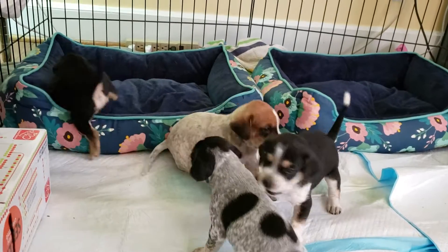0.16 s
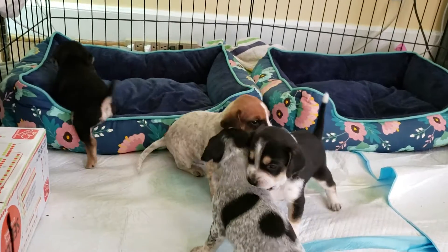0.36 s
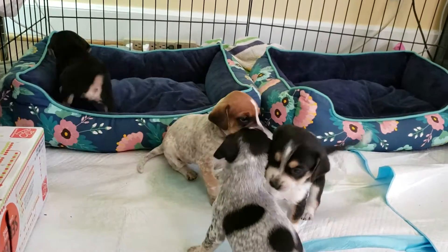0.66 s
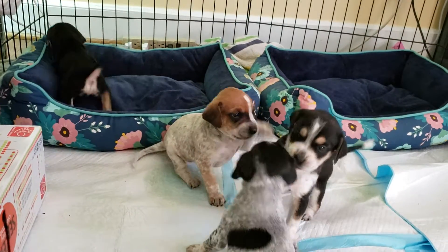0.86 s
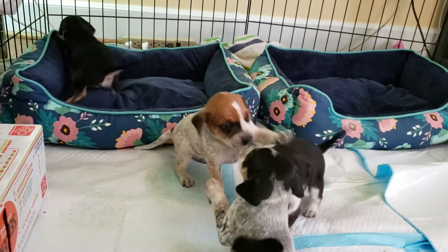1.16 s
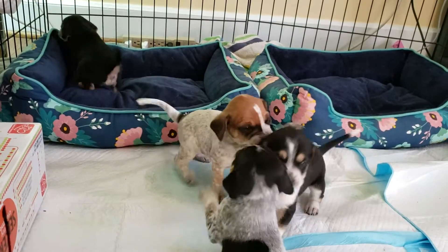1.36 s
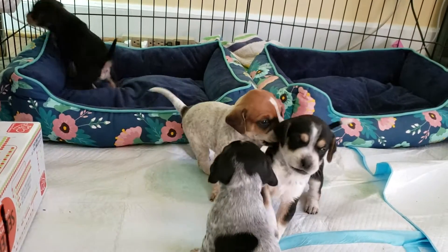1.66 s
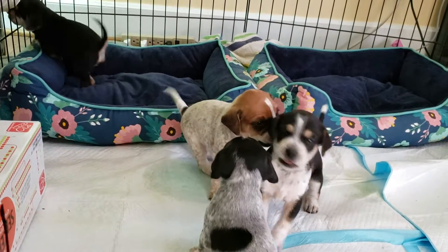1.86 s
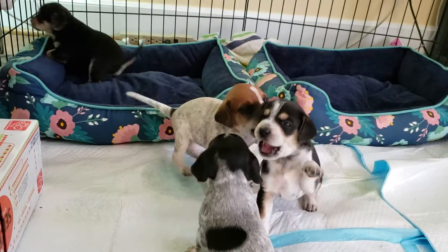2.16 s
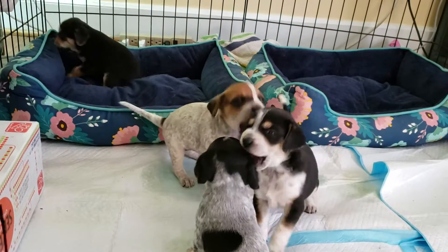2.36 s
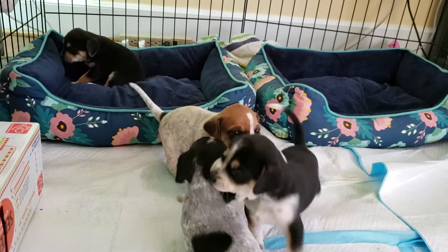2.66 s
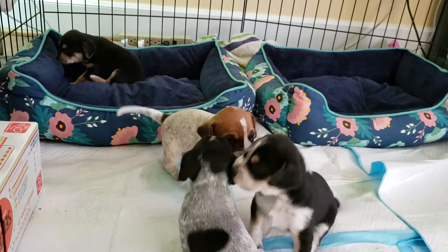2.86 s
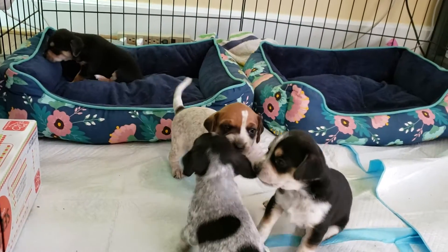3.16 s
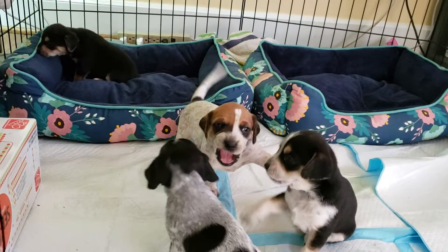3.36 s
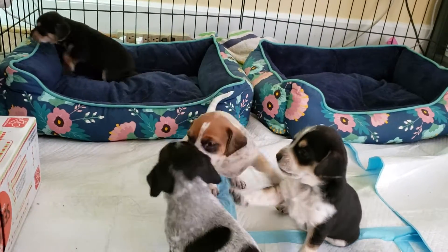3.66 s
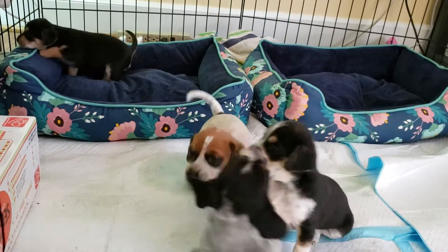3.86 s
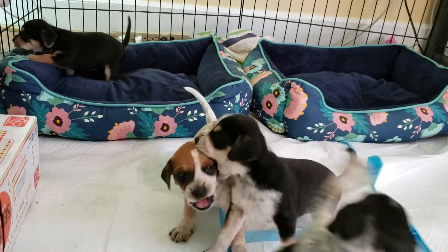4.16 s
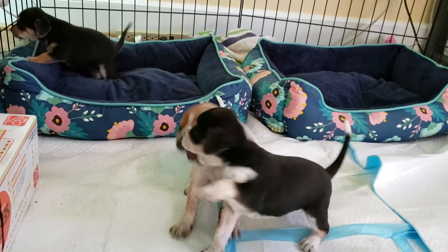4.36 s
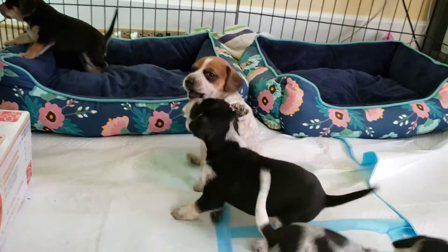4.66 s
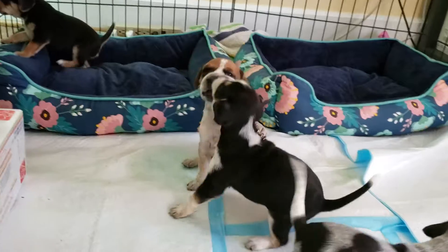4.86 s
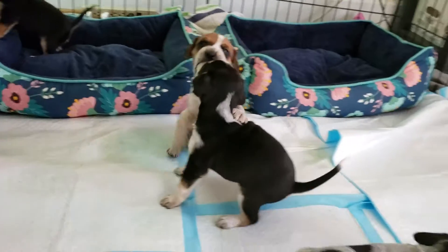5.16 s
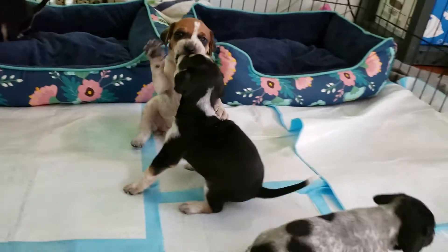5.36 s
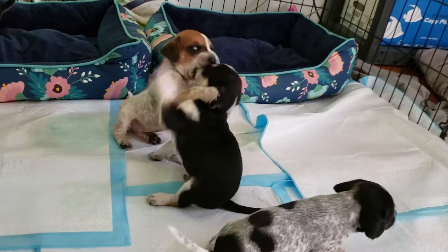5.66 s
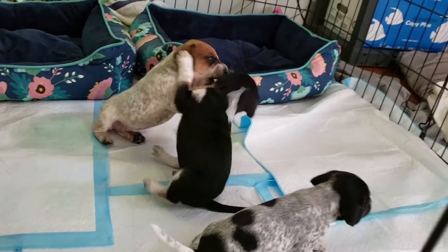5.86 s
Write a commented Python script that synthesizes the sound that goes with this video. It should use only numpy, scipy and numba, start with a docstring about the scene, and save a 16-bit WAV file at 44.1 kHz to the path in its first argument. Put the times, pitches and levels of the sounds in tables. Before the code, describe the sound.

Quiet opening of rustling absorbent pads and padding paws, with a slight hiss behind. Around two seconds a puppy squeaks several times, then gives a soft low whimper. The play turns rougher: fluttering, throaty little growls in quick spurts, one sharp hoarse bark, clicks of claws or teeth and dull footfalls. Close stereo pickup, short reflections of a small indoor room; growling continues to the end.

```python
"""Soft hiss and low rumble, paper pads rustling and paws padding: puppies wrestle in an indoor pen.
Four short yips and a low whimper lead into rattling play growls and one hoarse bark.
Voices are pulsing folds or stacked harmonics, shaped by throat and mouth resonances.
Paws are damped sines and noise pats, pads and scuffs are shaped crinkles, claws are tiny noise rings.
A small room answers the voices, footfalls and ticks."""
import sys
import numpy as np
from scipy import signal
from scipy.fft import rfft, irfft
from scipy.io import wavfile
from scipy.ndimage import uniform_filter1d, map_coordinates
from numba import njit

SR = 44100
rng = np.random.default_rng(int(sys.argv[2]) if len(sys.argv) > 2 else 0)


def master_out(mix):
    """Clip the mix to full scale and print it as 16-bit PCM to the path in sys.argv[1]."""
    frames = np.transpose(np.atleast_2d(mix))
    ceiling = np.clip(frames, -1, 1)
    pcm = np.round(ceiling * 32767).astype(np.int16)
    wavfile.write(sys.argv[1], SR, pcm)


N = 264600
TIME = np.arange(N) / SR


def undb(db):
    """Decibels to gain."""
    return 10 ** (np.asarray(db) / 20)


def unit(x):
    """Scale to rms 1."""
    return x / np.sqrt(np.mean(x ** 2) + 1e-20)


def colour(x, points):
    """EQ by (f/Hz, level/dB) points joined on a log-frequency axis."""
    hz, db = np.transpose(points)
    f = np.arange(N + 1) * SR / (2 * N)
    gain = undb(np.interp(np.log(f + 1), np.log(hz), db))
    return irfft(rfft(x, 2 * N) * gain)[..., :N]


def walk(rate):
    """Smooth random drift around 0, with `rate` new values per second."""
    knots = rng.standard_normal(N // 20)
    return map_coordinates(knots, [TIME * rate], order=2, mode="wrap")


def add(out, s, sound):
    """Mix a short sound in at time s."""
    i = max(int(s * SR), 0)
    out[..., i:i + sound.shape[-1]] += sound[..., :N - i]


def bandlimit(x, order, hz, kind):
    """Butterworth filter."""
    return signal.sosfilt(signal.butter(order, hz, kind, fs=SR, output="sos"), x)


# stereo width of diffuse sound: f/Hz, level/dB (side minus mid)
DIFFUSE_WIDTH = [(300, -12.5), (700, -2), (4000, 0)]


def spread(pair):
    """Two unrelated signals as a diffuse field: alike in the bass, unlike in the treble."""
    side = colour(pair[1], DIFFUSE_WIDTH)
    return np.array([pair[0] + side, pair[0] - side])


def lean(pair, balance):
    """Tilt two channels against each other by (f/Hz, left minus right level/dB) points."""
    left = colour(pair[0], [(hz, db / 2) for hz, db in balance])
    right = colour(pair[1], [(hz, -db / 2) for hz, db in balance])
    return np.array([left, right])


# relative spectrum of rumble and hiss: f/Hz, level/dB
FLOOR_SPECTRUM = [(25, -51), (58, 18), (130, -7.5), (400, -25), (1400, -32.5), (2200, -15.5), (6000, -20),
                  (8500, -39), (13000, -77)]
# stereo lean of rumble and hiss: f/Hz, level/dB (left minus right)
FLOOR_BALANCE = [(400, 3.5), (1300, 16), (4400, 14.5), (8000, -7)]
FLOOR_DB = -62.5


def floor():
    """A low room rumble and soft hiss: steady diffuse noise, coloured and tilted in stereo."""
    noise = unit(colour(rng.standard_normal((2, N)), FLOOR_SPECTRUM))
    return lean(spread(noise), FLOOR_BALANCE) * undb(FLOOR_DB)


def crinkle(rate, scatter_db, hiss):
    """Two channels of paper fibres snapping at random (rate per s) over a smooth rubbing hiss."""
    sizes = undb(scatter_db * np.minimum(rng.exponential(size=N), 5))
    snaps = (rng.random(N) < rate / SR) * sizes
    bursts = signal.lfilter([1], [1, -np.exp(-1 / 20)], snaps)  # each dies away over 20 samples
    crackle = unit(bursts * rng.standard_normal((2, N)))
    return (crackle + hiss * rng.standard_normal((2, N))) / np.hypot(1, hiss)


# relative spectrum of the paper pads: f/Hz, level/dB
PAD_SPECTRUM = [(150, 0.5), (400, -12), (2300, -16.5), (6500, -10.5), (8300, -28), (12500, -17.5)]
# weight shifts on the pads: peak t/s, t/s from the peak to where power is e^-2, peak level/dB before flicker
WEIGHT_SHIFTS = [(0.282, 0.13, -55.5), (0.9, 0.13, -59.5), (1.233, 0.089, -59), (1.923, 0.027, -43.5),
                 (2.798, 0.15, -53), (3.83, 0.35, -58.5), (4.399, 0.17, -50), (4.761, 0.1, -51),
                 (5.067, 0.017, -45.5), (5.148, 0.078, -49.5)]
PAD_REST_DB = -69  # rustle between the shifts


def pads():
    """The pads rustle as the puppies shift their weight: each shift swells to a peak and settles."""
    power = undb(PAD_REST_DB) ** 2
    for s, length, db in WEIGHT_SHIFTS:
        swell = np.exp(-2 * np.abs((TIME - s) / length) ** 0.78)
        power = power + undb(db) ** 2 * swell
    paper = unit(colour(crinkle(rate=1300, scatter_db=4.5, hiss=1.7), PAD_SPECTRUM))
    flicker = undb(1.7 * walk(35))
    return spread(paper * np.sqrt(power) * flicker)


# footfalls: t/s, thud level/dB (peak of each floor tone), pat level/dB (noise rms before its decay)
FOOTFALLS = [(0.027, -60, -51.5), (0.127, -57.5, -52.5), (1.285, -50.5, -56.5), (1.337, -54, -67),
             (2.769, -68, -45.5), (3.795, -57, -55), (5.119, -48, -40.5), (5.152, -48, -43.5),
             (5.236, -53, -51.5)]


def steps(floor_hz=(60, 82, 108), decay_s=0.03, pat_hz=600, pat_s=0.009):
    """Soft paws thud on the floor as three damped tones and pat the pad as a short noise."""
    out, t = np.zeros(N), TIME[:SR // 4]
    for s, thud_db, pat_db in FOOTFALLS:
        thud = np.zeros(len(t))
        for hz in floor_hz:
            detune = 1 + 0.1 * rng.standard_normal()
            thud += np.sin(2 * np.pi * hz * detune * t)
        pat = unit(bandlimit(rng.standard_normal(len(t)), 1, (pat_hz / 4, pat_hz), "band"))
        add(out, s, thud * np.exp(-t / decay_s) * undb(thud_db))
        add(out, s, pat * np.exp(-t / pat_s) * undb(pat_db))
    return bandlimit(out, 4, 48, "high")


# sliding paws: t/s, nominal length t/s (stretched in scuffs), level/dB, centre f/Hz, width [octaves]
PAW_SLIDES = [(0.268, 0.44, -70.5, 890, 0.36), (0.338, 0.064, -65, 1390, 0.51),
              (0.792, 0.21, -73.5, 480, 0.58), (1.8, 0.09, -69.5, 7020, 0.067),
              (1.849, 0.29, -56, 4100, 3.7), (1.891, 0.32, -60.5, 268, 1.08), (2.757, 0.19, -61, 753, 1.08),
              (3.863, 0.11, -56, 4930, 0.33)]


def scuffs(attack=0.26, stretch=1.124):
    """A sliding paw gives a swell of crinkles that rises fast and dies away."""
    out, grain = np.zeros((2, N)), crinkle(rate=770, scatter_db=-3.5, hiss=1.0)
    for s, length, db, hz, octaves in PAW_SLIDES:
        i, n = int(s * SR), int(length * stretch * SR)
        u = np.arange(n) / n  # progress through the slide
        f = np.arange(n // 2 + 1) * SR / n + 1
        band = np.exp(-.5 * (np.log2(f / hz) / octaves) ** 2)
        band = band * np.where(f > 7300, .35, 1)  # duller top
        slide = unit(irfft(rfft(grain[:, i:i + n]) * band, n))
        swell = unit(u ** attack * (1 - u) ** 2)
        add(out, s, slide * swell * undb(db))
    return spread(out)


# claws and teeth ticking: t/s, level/dB (ring rms before its decay), ring f/Hz
CLAW_TICKS = [(0.33, -48, 5730), (0.345, -45, 5050), (1.566, -52, 1010), (1.817, -44.5, 2400),
              (2.091, -34.5, 2700), (3.201, -47, 4600), (3.811, -42.5, 899), (3.861, -40.5, 5810),
              (4.18, -37.5, 2300), (4.616, -39, 889), (5.058, -43, 5638), (5.119, -35, 779)]


def ticks(ring_s=0.0013, sharpness=3):
    """A claw or tooth gives a crack with a very short ring: resonant noise that decays at once."""
    out, t = np.zeros(N), TIME[:SR // 20]
    for s, db, hz in CLAW_TICKS:
        b, a = signal.iirpeak(hz, sharpness, fs=SR)
        ring = unit(signal.lfilter(b, a, rng.standard_normal(len(t))))
        add(out, s, ring * np.exp(-t / ring_s) * undb(db))
    return out


def folds(hz, rough, jitter, skip, shimmer_db, air):
    """Vocal fold pulses; roughness jitters them, weakens every other one and adds puffs of turbulence."""
    phase = np.cumsum(hz * np.exp(jitter * rough * walk(260))) / SR  # in cycles
    cycles = np.arange(1, int(phase[-1]))
    at = np.interp(cycles, phase, np.arange(N))  # pulse positions in samples
    r = rough[at.astype(int)]
    shimmer = undb(shimmer_db * r * rng.standard_normal(len(at)))
    size = shimmer * (1 - np.clip(skip * r, 0, 1) * (cycles % 2))
    # windowed sincs place the pulses between samples
    taps = at.astype(int)[:, None] + np.arange(-7, 9)
    offset = taps - at[:, None]
    shape = np.sinc(offset) * np.cos(np.pi * offset / 16) ** 2
    pulses = np.bincount(np.clip(taps, 0, N - 1).ravel(), (size[:, None] * shape).ravel(), N)
    puff_size = size[np.clip(phase.astype(int) - 1, 0, len(size) - 1)]
    puffs = np.exp(-(phase % 1) / 0.88) * puff_size * rng.standard_normal(N)
    radiated = bandlimit(pulses, 2, 120, "high")  # steady flow makes no sound
    rasp = bandlimit(puffs, 2, 650, "high")  # turbulence has little bass
    return unit(radiated) + air * rough * unit(rasp)


def calls(table, fade_s):
    """For each moment: the gate, time into the nearest call, its arch of effort (0-1), rest of its row."""
    rows = np.array(table)
    ends = rows[:, 0] + rows[:, 1]
    halfway = (ends[:-1] + rows[1:, 0]) / 2
    s, length, *columns = rows[np.searchsorted(halfway, TIME)].T
    gate = sum(np.clip(np.minimum(TIME - on, off - TIME) / fade_s + .5, 0, 1)
               for on, off in zip(rows[:, 0], ends))
    age = np.clip(TIME - s, 0, length)
    return [gate, age, np.sin(np.pi * age / length), length] + columns


# yips: t/s, length t/s, base f/Hz, top f/Hz, top t/s after onset, arch width t/s,
# onset overshoot [share of base], tone level/dB at mid-call, fading [dB per s]
YIP_CALLS = [(1.876, 0.047, 658, 732, 0.051, 0.014, 0.28, -49.5, 68),
             (2.065, 0.13, 714, 1084, .067, .036, 0.04, -41, 0),
             (2.357, 0.14, 548.4, 670, .086, .036, 0.0189, -48.5, 67),
             (2.638, 0.11, 604, 670, 0.076, 0.018, 0.096, -45.5, -17)]
# relative throat colour: f/Hz, level/dB
YIP_THROAT_EQ = [(620, -0.5), (790, -0.5), (1080, 3), (1300, -1.5), (1850, 4.5), (2300, -12)]
# shrill upper resonance before its loudness gain: f/Hz, level/dB
YIP_EDGE_EQ = [(3800, -52), (5000, -14), (6000, -10.5), (8000, -37)]
# the folds close softly: level/dB of harmonics 1 to 4
YIP_HARMONICS = [1, -0.5, -9, -15]
OVERSHOOT_S, YIP_SWELL_DB = .014, 4.5  # the pitch drops into the note; the level sags at both ends
EDGE_FROM_DB, EDGE_GROWTH = -42.5, 0.74  # edge: this many extra dB per dB above the level, less below


def yips():
    """Clear arched squeals through a small throat, shriller when loud."""
    (gate, age, effort, length, base_hz, top_hz,
     top_s, arch_s, overshoot, db, fading) = calls(YIP_CALLS, fade_s=0.013)
    onset = base_hz * (1 + overshoot * np.exp(-age / OVERSHOOT_S))
    arch = np.exp(-.5 * np.abs((age - top_s) / arch_s) ** 2.4)
    hz = onset + (top_hz - base_hz) * arch
    db = db - YIP_SWELL_DB * (1 - effort) - fading * (age - length / 2)
    phase = 2 * np.pi * np.cumsum(hz * (1 + .011 * walk(260))) / SR
    tone = unit(sum(undb(partial) * np.sin(k * phase) for k, partial in enumerate(YIP_HARMONICS, 1)))
    buzz = folds(hz, np.ones(N), jitter=0.004, skip=0, shimmer_db=1.0, air=0.02)
    edge = 2 * colour(buzz, YIP_EDGE_EQ) * undb(EDGE_GROWTH * (db - EDGE_FROM_DB))
    return (unit(colour(tone, YIP_THROAT_EQ)) + edge) * gate * undb(db)


def steady(x):
    """Hold the short-term power of a source near 1, without lifting near-silence all the way."""
    power = uniform_filter1d(x ** 2, size=1300)
    return x / np.sqrt(np.abs(power) + np.mean(x ** 2) / 10 ** 2)


def tract(x, points, size=4096):
    """A throat shaped by (f/Hz, level/dB) points that rings on after each pulse (minimum phase)."""
    hz, db = np.transpose(points)
    f = np.arange(size + 1) * SR / (2 * size)
    gain = undb(np.interp(np.log(f + 1), np.log(hz), db))
    cepstrum = irfft(np.log(gain))[:size]
    cepstrum[1:] *= 2  # folding the cepstrum makes the phase minimal
    response = irfft(np.exp(rfft(cepstrum, 2 * size)))[:size]
    return signal.oaconvolve(x, response)[:N]


@njit
def resonance(x, hz, width_hz):
    """A band-pass whose centre moves, gain 1 at the centre."""
    y, b, low = np.empty(len(x)), 0., 0.
    for i in range(len(x)):
        g, k = np.tan(np.pi * hz[i] / SR), width_hz / hz[i]
        v = (b + g * (x[i] - low)) / (1 + g * (g + k))
        b, low, y[i] = 2 * v - b, low + 2 * g * v, k * v
    return y


def formant(x, hz, width_hz):
    """A moving resonance with steep skirts: two band-passes in a row."""
    return resonance(resonance(x, hz, width_hz), hz, width_hz)


def courses(table, fade_s):
    """For each moment: the gate, roughness, pitch, chest level and mouth level of the growl under way."""
    gate = sum(np.clip(np.minimum(TIME - rows[0][0], rows[-1][0] - TIME) / fade_s + .5, 0, 1)
               for _, rows in table)
    points = [(row[0], rough, *row[1:]) for rough, rows in table for row in rows]
    s, *columns = np.array(points).T
    return [gate] + [np.interp(TIME, s, column) for column in columns]


# whimper, then growls: roughness [0-1], course of rows: t/s, f/Hz before wander,
# chest level/dB and open mouth level/dB before flutter and rattle
GROWL_COURSES = [(.08, [(2.912, 308.7, -47.5, -57.5), (2.948, 303, -37.5, -52),
                 (2.975, 270, -43.5, -57.5)]), (0.4205, [(3.478, 212, -52, -79), (3.53, 264, -44, -57.5),
                 (3.58, 257.3, -49.5, -54.5), (3.615, 232.8, -42, -62.5), (3.68, 261, -48.5, -56),
                 (3.75, 286, -58.5, -79)]), (.55, [(3.975, 237.9, -42, -44.5), (4.04, 331.6, -40, -47),
                 (4.16, 254.4, -47.5, -58.5), (4.218, 300.3, -39, -48)]),
                 (0.75, [(4.247, 301.2, -38.5, -51.5), (4.365, 298.3, -45, -51.5),
                 (4.402, 361.5, -37.5, -47.5), (4.455, 344.5, -34.5, -44.5), (4.535, 290.3, -40, -54.5)]),
                 (.75, [(4.68, 260.2, -49.5, -57), (4.72, 291.5, -43.5, -55.5), (4.743, 336.2, -36, -44.5),
                 (4.786, 312.8, -38.5, -48.5), (4.845, 301, -59, -60.5)]),
                 (0.97, [(5.015, 262.4, -48, -53.5), (5.05, 322.2, -46.5, -51.5), (5.105, 279.9, -52, -60),
                 (5.175, 297.4, -40, -62)]), (.74, [(5.455, 289.5, -52.5, -58), (5.497, 324, -47.5, -55),
                 (5.62, 304.5, -50, -60), (5.735, 335, -55, -56), (5.795, 338.7, -45, -50.5),
                 (5.87, 241, -52, -63.5), (5.96, 311.5, -43, -54), (6.0, 268.8, -39.5, -54)])]
# relative chest colour: f/Hz, level/dB
CHEST_EQ = [(155, -11.5), (210, 7.5), (460, 1.5), (620, -13.5), (1400, -42)]
# relative mouth colour: f/Hz, level/dB
MOUTH_EQ = [(350, -24.5), (650, 3), (2100, 2), (2800, -15), (6700, -15.5), (8500, -47)]
# upper mouth resonance, high when the lips draw back: t/s, f/Hz
LIP_COURSE = [(2.95, 1190), (3.57, 1730), (3.66, 1120), (4.25, 870), (4.46, 1399), (4.81, 2051),
              (5.05, 959.6), (5.51, 1558), (5.68, 1168), (5.81, 1822), (5.92, 849.7)]
JAW_HZ, JAW_WANDER = 786, 0.076  # the lower mouth resonance shifts as the puppy chews
PITCH_WANDER = .06  # share by which the pitch of a fully rough growl wavers
GROWL_SHIMMER_DB = 4.0  # pulse-to-pulse level scatter at full roughness


def growls():
    """Rattling folds boom in the chest and rasp through the mouth, which brightens as the lips draw back."""
    gate, rough, hz, chest_db, mouth_db = courses(GROWL_COURSES, fade_s=0.03)
    rough = np.clip(rough, 0, 1)
    hz = hz * (1 + PITCH_WANDER * rough * walk(35))
    chest_folds = folds(hz, rough, jitter=.15, skip=1.1, shimmer_db=GROWL_SHIMMER_DB, air=0.5)
    body = tract(chest_folds, CHEST_EQ)
    boom = resonance(body, hz, 200.0)  # the throat booms with the fundamental
    chest = steady(body + 1.07 * boom) * undb(chest_db)
    mouth_folds = folds(hz, rough, jitter=.15, skip=1.3, shimmer_db=GROWL_SHIMMER_DB, air=1.1)
    throat = tract(mouth_folds, MOUTH_EQ)
    lips_hz = np.interp(TIME, *np.transpose(LIP_COURSE))
    opening = lips_hz / lips_hz.max()
    jaw = formant(throat, JAW_HZ * np.exp(JAW_WANDER * walk(20)), 474.0)
    lips = formant(throat, lips_hz, 640.0)
    bright = opening * (0.72 * lips + 0.5 * opening * throat)
    mouth = steady(jaw + bright) * undb(mouth_db)
    rattle = undb(1.8 * rough * walk(110))
    flap = np.sin(2 * np.pi * 27.0 * TIME + walk(10))  # loose throat tissue flaps
    flutter = undb(3.1 * rough * flap)
    return gate * (flutter * chest + rattle * mouth)


# relative throat resonances of the bark: f/Hz, level/dB
BARK_THROAT_EQ = [(550, 3.5), (856, 13), (1350, -1), (1560, 8), (2150, 7), (2900, -5), (5300, 0.5),
                  (6700, -8), (8000, -27)]
CATCH_S, CATCH_DB = 3.977, -45  # a quiet catch of the voice ahead of the bark
BARK_S, BARK_DB, BARK_ATTACK_S, BARK_HOLD_S = 4.012, -33.5, 0.015, 0.034  # the attack ends at BARK_S
BARK_SAG_DB_PER_S, BARK_FALL_DB_PER_S = 131, 262  # level lost while it is held, and in addition afterwards
BARK_SHIMMER_DB = 2.5


def bark():
    """A hard push with the jaws wide: a hoarse tone through sharp throat resonances."""
    pitch_hz = np.full(N, 287.)
    source = folds(pitch_hz, np.ones(N), jitter=0.05, skip=0.35, shimmer_db=BARK_SHIMMER_DB, air=0.7)
    t = TIME - BARK_S
    sag = BARK_SAG_DB_PER_S * np.maximum(t, 0)
    fall = BARK_FALL_DB_PER_S * np.maximum(t - BARK_HOLD_S, 0)
    burst = np.clip(1 + t / BARK_ATTACK_S, 0, 1) * undb(BARK_DB - sag - fall)
    catch = undb(CATCH_DB) * (TIME > CATCH_S) * (t < 0)
    return steady(tract(source, BARK_THROAT_EQ)) * np.maximum(burst, catch)


PATTERN_HZ = 1.3  # turns per second of the reflection pattern


def room(x, wet_db, t60_s, early_db, early_s):
    """Close reflections from floor and pen, then a small room's tail; two random patterns trade steadily."""
    early, tail = np.exp(-TIME / early_s), np.exp(-np.log(1000) * TIME / t60_s)
    level = undb(early_db) * unit(early) + undb(wet_db) * unit(tail)
    shape = (TIME > .002) * level / np.sqrt(N)
    turn, out = 2 * np.pi * PATTERN_HZ * TIME, x
    for share in (np.cos(turn), np.sin(turn)):
        response = spread(shape * rng.standard_normal((2, N)))[:, :SR]
        sent = np.broadcast_to(x * share, (2, N))
        out = out + signal.fftconvolve(sent, response, axes=1)[:, :N]
    return out


def scene():
    """Voices, footfalls and ticks with the room around them, over pads, scuffs and the noise floor."""
    near = yips() + growls() + bark() + ticks() + steps()
    heard = room(near, wet_db=-3.0, t60_s=0.32, early_db=-6, early_s=0.0051)
    return heard + pads() + scuffs() + floor()


# colour difference of the two microphones: f/Hz, level/dB (left minus right)
MIC_BALANCE = [(300, -1.5), (700, 1.5), (2500, 3), (5000, 0), (13000, -8)]
TOP_HZ = 15850


def record(dry):
    """The two microphones differ in colour, and the top is cut steeply."""
    top_cut = signal.ellip(10, .2, 70, TOP_HZ, fs=SR, output="sos")
    return signal.sosfilt(top_cut, lean(dry, MIC_BALANCE))


dry = scene()
out = record(dry)
master_out(out)
```